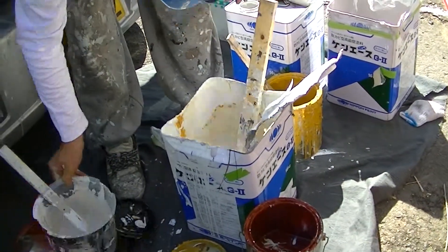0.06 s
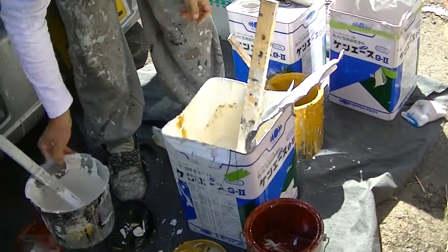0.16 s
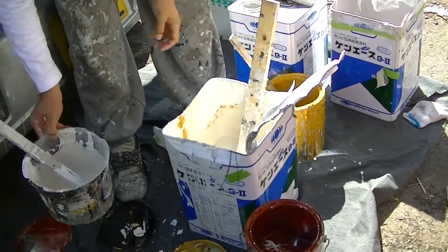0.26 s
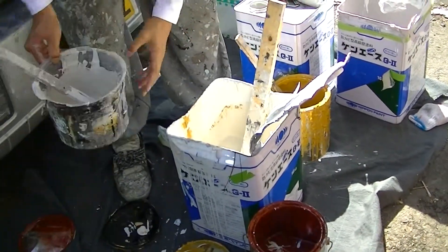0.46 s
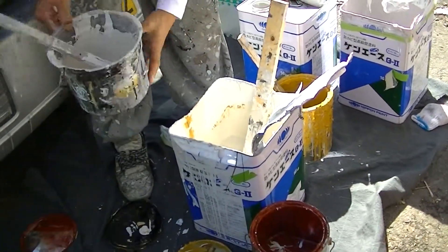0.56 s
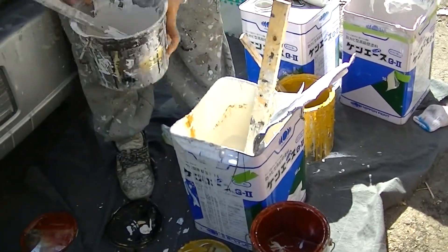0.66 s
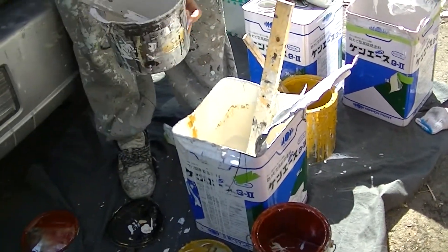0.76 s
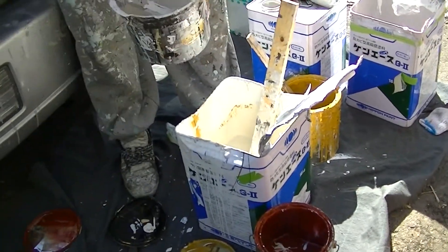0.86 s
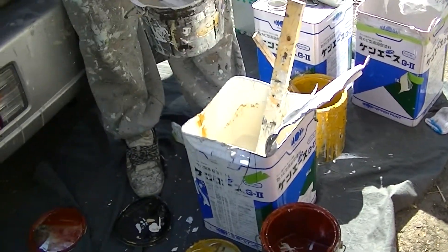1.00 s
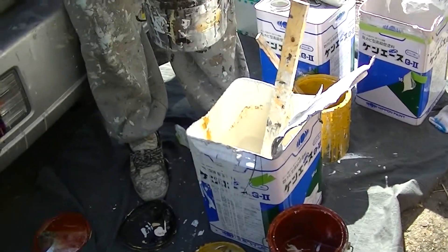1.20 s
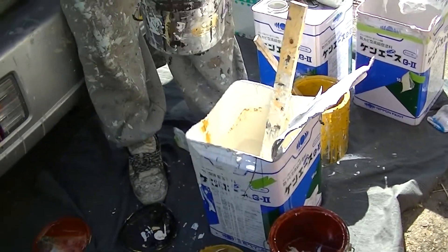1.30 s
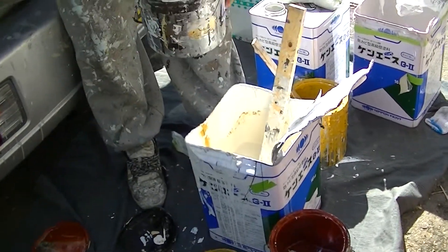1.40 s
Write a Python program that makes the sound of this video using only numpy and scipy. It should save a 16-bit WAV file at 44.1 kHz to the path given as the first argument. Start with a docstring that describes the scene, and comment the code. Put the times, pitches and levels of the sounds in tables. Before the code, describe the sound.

A paint pot knocks twice against a ringing tin, then its handle scrapes and ticks.

```python
"""A paint pot with a stirring stick in it is lifted outdoors, over quiet open air; close, dry, nearly mono.
It drags and bumps on a ground sheet, then knocks twice against a tin (0.2 s, 0.32 s): the metal rings.
From 0.6 s it is carried up: the wire handle squeaks once, handle and hands scrape and tick on it,
and the stick clacks on the rim. Clothes rustle softly near the end."""
import sys
import numpy as np
from scipy import signal
from scipy.fft import rfft, irfft
from scipy.io import wavfile
from scipy.ndimage import uniform_filter1d

SR = 44100
rng = np.random.default_rng(int(sys.argv[2]) if len(sys.argv) > 2 else 0)


def materialize(psi):
    """Save the field psi as 16-bit PCM at rate SR to the path in sys.argv[1].

    A 1-D psi becomes a single channel; in a 2-D psi each row is a channel.
    """
    bounded = np.clip(np.atleast_2d(psi).T, -1, 1)
    quanta = np.round(bounded * 32767).astype(np.int16)
    wavfile.write(sys.argv[1], SR, quanta)


N = 63945
TIME = np.arange(N) / SR
RING_TIME = TIME[:SR // 2]

# Open air. Each row: frequency in Hz, relative density in dB.
AIR_SPECTRUM = [(25, -38), (70, -31), (110, -21.5), (170, -14.5), (300, -5.5), (600, 0), (840, 4),
                (1150, -2), (1450, 0.5), (2000, -6), (3000, -11), (5000, -16.5), (10000, -21), (15000, -27)]
# Likeness of the air at left and right. Each row: frequency in Hz, correlation from 0 to 1.
AIR_COHERENCE = [(40, 0.39), (120, 0.71), (300, 0.97), (1000, .98), (4000, 0.87), (12000, 1)]
# Clothing rustles. Each row: centre in seconds, level in dB, half-width in seconds.
RUSTLE_EVENTS = [(1.115, -68.5, 0.074), (1.213, -64.5, 0.048), (1.431, -67, 0.07)]
# Cloth. Each row: frequency in Hz, relative density in dB.
RUSTLE_SPECTRUM = [(40, -33), (90, -18), (150, -7), (350, -2), (900, -10.5), (3000, -26), (16000, -60)]
# Pot sliding on the sheet. Each row: time in seconds, level in dB.
DRAG_ENVELOPE = [(0, -54.5), (.04, -51.5), (.062, -45), (.085, -58.5), (.115, -61), (.19, -62.5)]
# Sheet friction. Each row: frequency in Hz, relative density in dB.
DRAG_SPECTRUM = [(100, -15), (350, -14), (800, -17), (1600, -1), (3000, -11), (6000, -12.5), (10000, -14),
                 (16000, -27)]
# Resonances of the sliding pot. Each row: centre in Hz, half-width in Hz, boost in dB.
DRAG_RESONANCES = [(777, 13, 20), (1027, 18, 20), (1290, 33, 14), (1780, 61, 9.5)]
# Handle scraping. Each row: time in seconds, level in dB.
SCRAPE_ENVELOPE = [(.58, -82), (.597, -53.5), (.622, -64.5), (.65, -50.5), (.68, -53.5), (.705, -65),
                   (.775, -56), (.805, -56.5), (.85, -62.5), (.862, -43), (.877, -51), (.9, -48),
                   (.922, -64), (.98, -70.5), (1.07, -56), (1.125, -74), (1.275, -61), (1.33, -77)]
# Handle ticks. Each row: start in seconds, level in dB, T60 in seconds.
TICK_EVENTS = [(.0785, -67, 0.017), (0.591, -57.5, .06), (.626, -36.5, 0.046), (0.856, -59, 0.024),
               (.864, -56, .03), (0.939, -49, 0.024), (1.171, -53, 0.15), (1.364, -60, 0.046)]
# Wire handle. Each row: frequency in Hz, relative density in dB.
WIRE_SPECTRUM = [(200, -32), (1000, -26), (2000, -2), (3000, -6), (5000, -5.5), (8000, -6), (10500, 3.5),
                 (11500, -7.5), (13000, -6), (16000, -20)]
# Handle resonances. Each row: centre in Hz, half-width in Hz, boost in dB.
WIRE_RESONANCES = [(3460, 60, 13), (4630, 120, 13.5), (5250, 55, 17), (6150, 116, 13), (6960, 140, 12),
                   (7720, 110, 13), (8350, 120, 10), (9900, 160, 1)]
# Stick on the rim. Each row: start in seconds, relative level in dB, tilt in dB per octave,
# contact time in seconds, chatter T60 in seconds.
CLACK_EVENTS = [(0.0694, -35, -6, 0.0035, 0.034), (0.6425, -37, -2, 0.0013, 0.023),
                (1.0642, -43.5, -5, 0.0037, 0.032), (1.155, -39.5, -2, 0.00063, 0.017),
                (1.188, -30.5, -1, 0.0047, 0.065), (1.43, -45.5, 1, 0.0022, 0.072)]
# Modes of stick and pot. Each row: frequency in Hz, T60 in seconds, relative level in dB.
STICK_MODES = [(816, 0.21, -17), (1145, 0.091, -14), (1562, 0.13, -13.5), (1734, 0.076, -8),
               (2180, 0.13, -21), (2225, 0.15, -8.5), (2366, 0.027, 1.5), (2865, 0.079, -6.5),
               (3496, 0.15, -11), (4720, 0.021, -14), (5550, .055, -8.5), (5710, 0.12, -14),
               (6100, 0.049, -8), (6900, 0.058, -10), (7770, 0.039, -7.5), (8600, 0.036, -17)]
# Stick chatter. Each row: frequency in Hz, relative density in dB.
CHATTER_SPECTRUM = [(100, -13), (500, -14), (1300, -14.5), (2200, 4.5), (3100, -5), (4000, -14.5),
                    (4650, -2), (5050, -8), (5550, -1), (6500, -7.5), (9000, -8), (12000, -21.5),
                    (16000, -30)]
# Contact noise. Each row: frequency in Hz, relative density in dB.
SNAP_SPECTRUM = [(200, -15), (1500, 11), (4000, 7), (6000, 7), (9000, -8), (16000, -12)]
# Dense sheet-metal modes. Each row: frequency in Hz, relative density in dB.
CLATTER_SPECTRUM = [(40, -47), (150, -44), (350, -16), (670, -18.5), (780, -4), (1750, 2), (2100, -7),
                    (3400, -23.5), (4800, -44), (9000, -27.5), (16000, -56)]
# Their damping. Each row: frequency in Hz, T60 in seconds.
CLATTER_DECAY = [(200, 0.15), (900, 0.23), (2000, 0.11), (4000, 0.16), (12000, 0.045)]
# Light bumps of the pot. Each row: start in seconds, level in dB, pitch in Hz, push rise in seconds.
BUMP_EVENTS = [(.0157, -41.5, 1230, 0.00067), (.0185, -39, 502, 0.00094), (.1017, -58, 1490, 0.00045),
               (.1677, -29.5, 1610, 0.00047)]
# Tin struck at two places. Each row: mode in Hz, T60 in seconds, levels in dB for knocks one and two.
TIN_MODES = [(480, 0.36, -42, -48), (781, 0.12, -38, -29), (812.4, 0.044, -16.5, -28.5),
             (873, 0.048, -28, -17.5), (1071, 0.2, -38, -27), (1292, 0.21, -25, -29),
             (1397, 0.24, -25, -32.5), (1475, 0.1, -23, -37), (1674, 0.12, -16, -28),
             (1703, 0.097, -37, -59), (1862, 0.16, -21.5, -38), (1978, 0.22, -31, -43),
             (2180, 0.1, -40, -38.5), (2408, 0.032, -35.5, -29), (2700, 0.16, -41, -59),
             (3460, 0.11, -45.5, -58), (4015, 0.045, -39, -49)]
# Pot against tin. Each row: start in seconds, push level in dB, push pitch in Hz, push rise in seconds,
# snap level in dB, clatter level in dB, clatter tilt in dB per octave, ring rise in seconds.
KNOCK_EVENTS = [(.2030, -5.5, 1177, 0.00061, -27, -24, 1, 0.0057),
                (.3155, -12.5, 851, 0.0025, -47.5, -30, -1, 0.0017)]
# Microphone balance. Each row: frequency in Hz, left minus right in dB.
MIC_BALANCE = [(60, -3), (200, -1), (700, -1.24), (2000, 0), (5000, -0.35)]


def amp(db):
    """Decibels to gain."""
    return 10 ** (np.asarray(db) / 20)


def unit(x):
    """Scale to rms 1."""
    return x / np.sqrt(np.mean(x ** 2) + 1e-20)


def read(points, hz):
    """Interpolate on a log-frequency axis."""
    points_hz, values = np.transpose(points)
    return np.interp(np.log(hz + 1), np.log(points_hz + 1), values)


def add(mix, start_s, sound):
    """Mix a sound in at start_s."""
    part = mix[max(round(start_s * SR), 0):][:len(sound)]
    part += sound[:len(part)]


def colour(x, spectrum, peaks=(), tilt_db=0):
    """Apply a spectrum, resonances and a tilt per octave; rms 1."""
    hz = np.fft.rfftfreq(len(x), 1 / SR)
    db = read(spectrum, hz) + tilt_db * np.log2(np.clip(hz, 700, 6000))
    for centre_hz, width_hz, boost_db in peaks:
        db = db + boost_db / (1 + ((hz - centre_hz) / width_hz) ** 2)
    return unit(irfft(rfft(x) * amp(db), len(x)))


def hiss(spectrum, peaks=(), tilt_db=0):
    """Half a second of coloured noise."""
    return colour(rng.standard_normal(len(RING_TIME)), spectrum, peaks, tilt_db)


def fade(t60_s, t=RING_TIME):
    """Exponential decay; 1 before t = 0."""
    return np.exp(-np.log(1000) * np.maximum(t, 0) / t60_s)


def air(level_db=-56, patch_db=1.5):
    """Distant outdoor wash with slowly drifting patches."""
    frames, hz = N // 256 + 5, np.fft.rfftfreq(1024, 1 / SR)
    left_re, left_im, other_re, other_im, patches = rng.standard_normal((frames, len(hz), 5)).T
    patches = uniform_filter1d(patches, size=10, axis=0)
    patches = unit(uniform_filter1d(patches, size=12, axis=1))
    coherence = np.clip(read(AIR_COHERENCE, hz), -1, 1)[:, None]
    left = left_re + 1j * left_im
    right = coherence * left + np.sqrt(1 - coherence ** 2) * (other_re + 1j * other_im)
    bins = np.array([left, right]) * amp(read(AIR_SPECTRUM, hz)[:, None] + patch_db * patches)
    return amp(level_db) * unit(signal.istft(bins, nperseg=1024, noverlap=768)[1][:, :N])


def yard_scatter(x, level_db=-23.5, t60_s=0.087):
    """Faint reflections off tins and a car nearby, different at each ear."""
    tail = rng.standard_normal((2, len(RING_TIME))) * fade(t60_s)
    return amp(level_db) * signal.fftconvolve(x[None], tail / np.linalg.norm(tail[0]), axes=1)[:, :N]


def rustles():
    """Clothes shift softly as the pot is steadied."""
    envelope = sum(amp(db) * np.exp(-((TIME - centre_s) / width_s) ** 2)
                   for centre_s, db, width_s in RUSTLE_EVENTS)
    return colour(rng.standard_normal(N), RUSTLE_SPECTRUM) * envelope


def friction(envelope, spectrum, peaks, slips_per_s=9000, spread_db=2):
    """Dense tiny slips excite the resonances of the rubbed object."""
    slips = (rng.random(N) < slips_per_s / SR) * rng.choice([-1, 1], N)
    strength = amp(spread_db * np.minimum(rng.exponential(1, N), 4))
    level_db = np.interp(TIME, *np.transpose(envelope))
    return colour(slips * strength, spectrum, peaks) * amp(level_db)


def drag():
    """The pot slides on the sheet until the first knock lifts it clear."""
    return friction(DRAG_ENVELOPE, DRAG_SPECTRUM, DRAG_RESONANCES) * (TIME < KNOCK_EVENTS[0][0])


def squeak(start_s=0.5915, length_s=0.022, pitch_hz=2080, sag_hz_per_s=4000, level_db=-49.5):
    """The handle squeaks as it starts to turn, sagging in pitch."""
    t = np.clip(TIME - start_s, 0, length_s)
    cycles = np.cumsum(pitch_hz - sag_hz_per_s * t) / SR
    envelope = np.sqrt(abs(np.sin(np.pi * t / length_s)))
    return amp(level_db) * envelope * np.sin(2 * np.pi * cycles)


def handle():
    """The wire handle scrapes and ticks in its lugs."""
    out = friction(SCRAPE_ENVELOPE, WIRE_SPECTRUM, WIRE_RESONANCES)
    for start_s, db, t60_s in TICK_EVENTS:
        add(out, start_s, amp(db) * hiss(WIRE_SPECTRUM, WIRE_RESONANCES) * fade(t60_s))
    return out


def clacks(rise_s=0.003, full_contact_s=0.0059):
    """The stick chatters on the rim and rings; shorter contacts excite the modes less."""
    out = np.zeros(N)
    attack = np.minimum(RING_TIME / rise_s, 1)
    for start_s, db, tilt_db, contact_s, chatter_t60_s in CLACK_EVENTS:
        released_s = RING_TIME - contact_s
        ring = 0
        for hz, t60_s, mode_db in STICK_MODES:
            tone = np.sin(2 * np.pi * (hz * RING_TIME + rng.random()))
            ring += amp(mode_db + tilt_db * np.log2(hz / 3000)) * fade(t60_s, released_s) * tone
        ring *= min(contact_s / full_contact_s, 1)
        chatter = hiss(CHATTER_SPECTRUM, tilt_db=tilt_db) * fade(chatter_t60_s, released_s)
        add(out, start_s, amp(db) * attack * (ring + chatter) / np.sqrt(2))
    return out


def push(start_s, hz, rise_s):
    """The wall gives way: a damped pulse of a few cycles."""
    t = np.maximum(TIME - start_s, 0)
    return np.sin(2 * np.pi * hz * t) * (t / rise_s * np.exp(1 - t / rise_s)) ** 2


def snap(start_s, width_s):
    """Bright noise for the duration of a contact."""
    envelope = np.exp(-((TIME - start_s - 2 * width_s) / width_s) ** 2)
    return colour(rng.standard_normal(N), SNAP_SPECTRUM) * envelope


def clatter(tilt_db=0):
    """Many close sheet-metal modes, the highest dying first."""
    hz, t, bins = signal.stft(hiss(CLATTER_SPECTRUM, tilt_db=tilt_db), SR, nperseg=256)
    bins *= fade(read(CLATTER_DECAY, hz)[:, None], t)
    return signal.istft(bins, SR, nperseg=256)[1][:len(RING_TIME)]


def bumps(snap_db=-10.5, clatter_db=-17):
    """Soft touches before the lift: a short clatter, and the tin's lowest mode hums on."""
    out, pushes = np.zeros((2, N))
    for start_s, db, hz, push_s in BUMP_EVENTS:
        pushes += amp(db) * push(start_s, hz, push_s)
        out += amp(db + snap_db) * snap(start_s, push_s)
        add(out, start_s, amp(db + clatter_db) * clatter() * fade(t60_s=0.025))
    hum_hz, t60_s, hum_db, _ = TIN_MODES[0]
    hum = amp(hum_db) * fade(t60_s) * np.sin(2 * np.pi * hum_hz * RING_TIME)
    return out + pushes + signal.fftconvolve(pushes, hum)[:N]


def knocks(ring_delay_s=0.00067):
    """Each knock pushes the wall; the ring spreads through the tin and beats as it dies."""
    out = np.zeros(N)
    for k, knock in enumerate(KNOCK_EVENTS):
        start_s, push_db, push_hz, push_s, snap_db, clatter_db, tilt_db, rise_s = knock
        ring = sum(amp(db[k]) * fade(t60_s) * np.sin(2 * np.pi * hz * RING_TIME)
                   for hz, t60_s, *db in TIN_MODES)
        ring += amp(clatter_db) * clatter(tilt_db)
        add(out, start_s + ring_delay_s, ring * np.minimum(RING_TIME / rise_s, 1))
        out += amp(push_db) * push(start_s, push_hz, push_s) + amp(snap_db) * snap(start_s, push_s)
    return out


def scene(low_cut_hz=460):
    """Handling sounds in open air; the pot's sounds are cut below a few hundred hertz."""
    pot = knocks() + bumps() + clacks() + handle() + squeak() + drag()
    pot = signal.sosfilt(signal.butter(2, low_cut_hz, "high", fs=SR, output="sos"), pot)
    return pot + yard_scatter(pot) + rustles() + air()


def record(dry):
    """Slight level difference between the microphones, then a band limit."""
    left_gain = amp(read(MIC_BALANCE, np.fft.rfftfreq(N, 1 / SR)) / 2)
    balanced = irfft(rfft(dry) * np.array([left_gain, 1 / left_gain]), N)
    lowpass = signal.firwin(511, cutoff=15750, window=("kaiser", 9), fs=SR)
    return signal.oaconvolve(balanced, lowpass[None], "same")


dry = scene()
out = record(dry)
materialize(out)
```